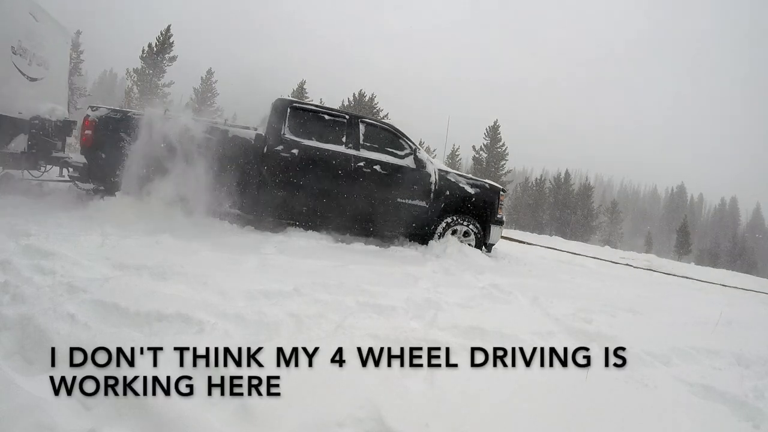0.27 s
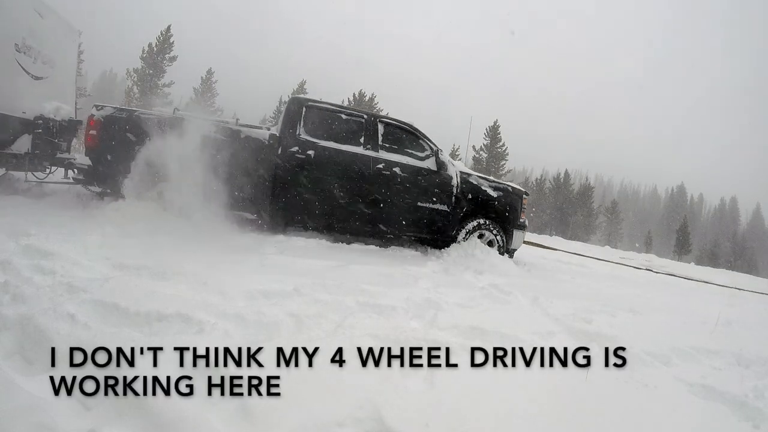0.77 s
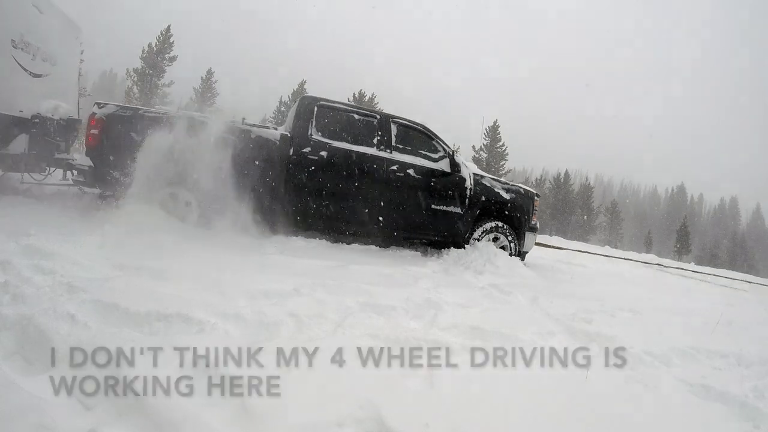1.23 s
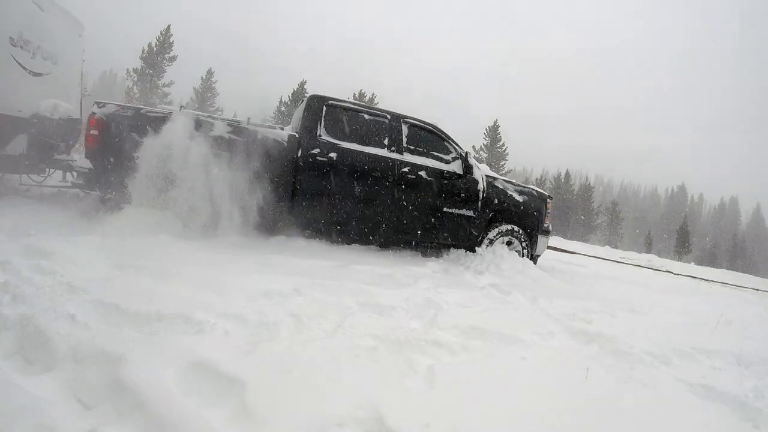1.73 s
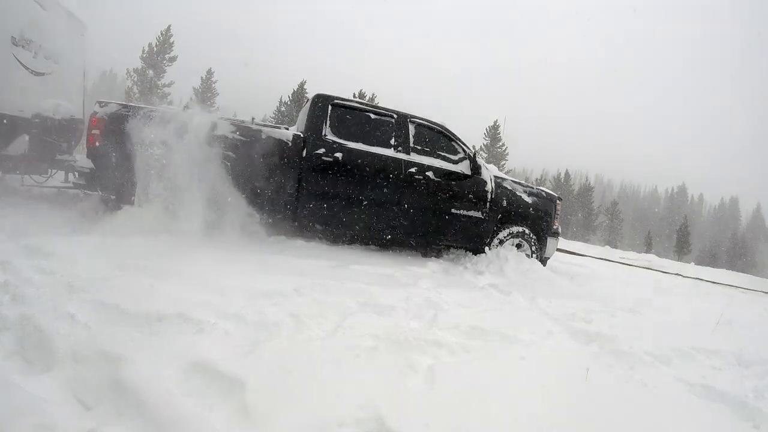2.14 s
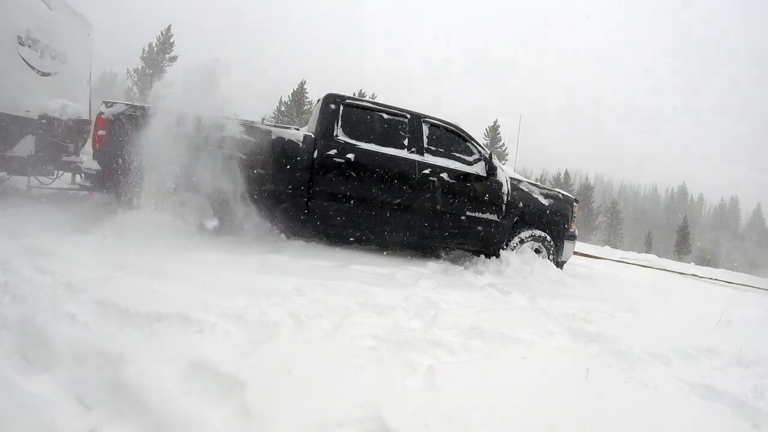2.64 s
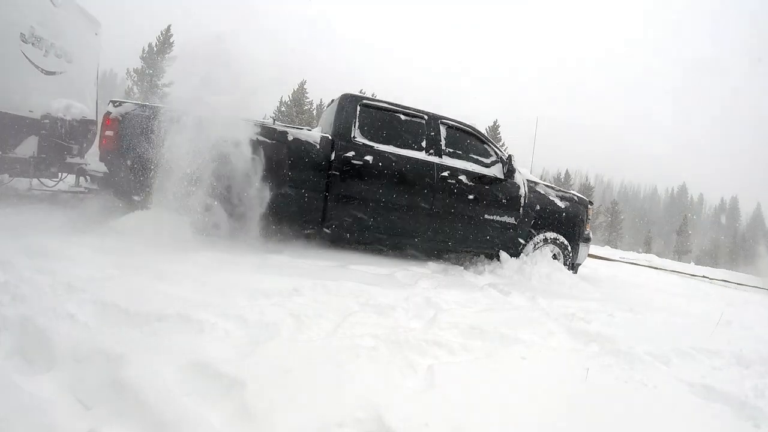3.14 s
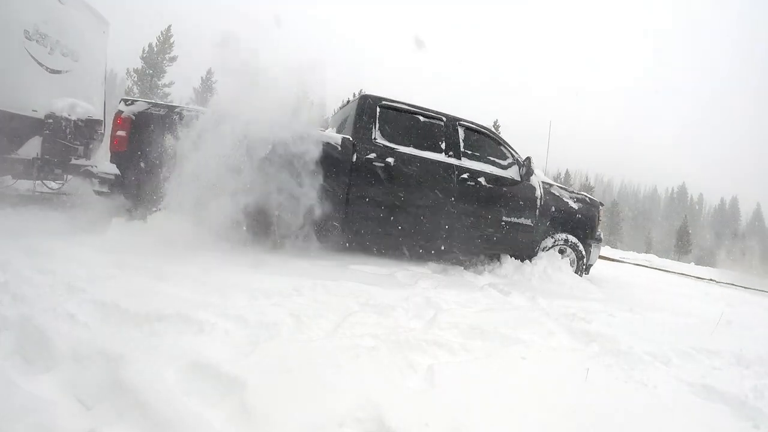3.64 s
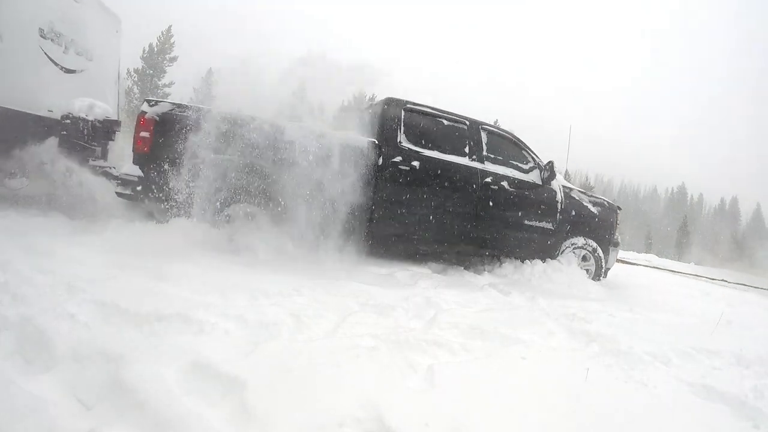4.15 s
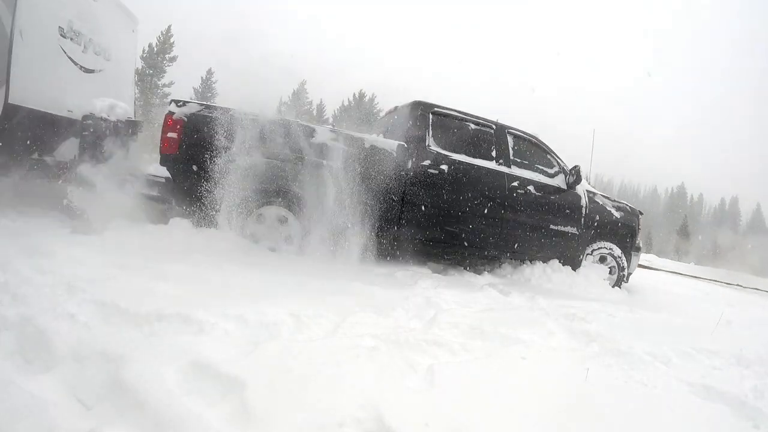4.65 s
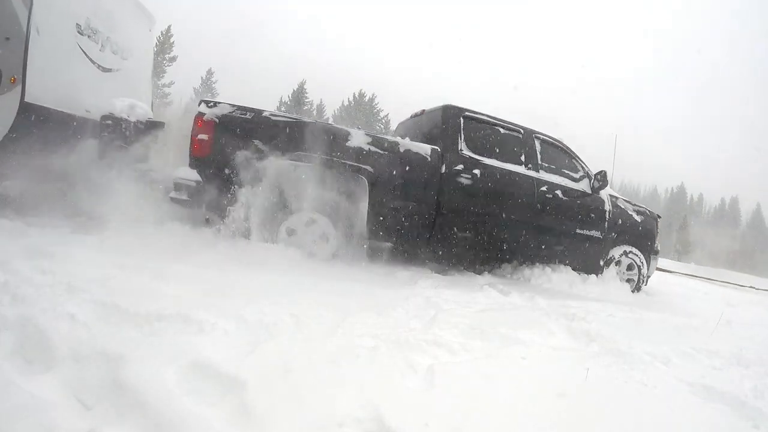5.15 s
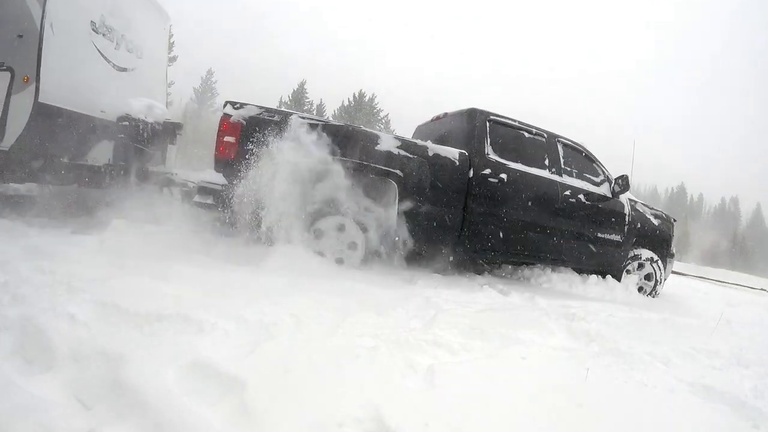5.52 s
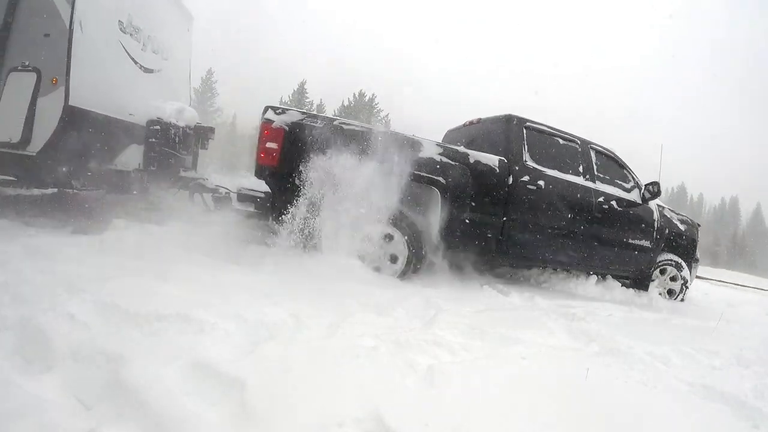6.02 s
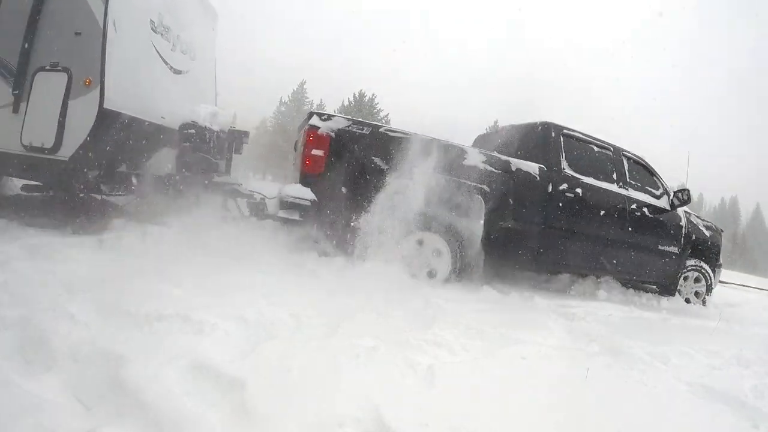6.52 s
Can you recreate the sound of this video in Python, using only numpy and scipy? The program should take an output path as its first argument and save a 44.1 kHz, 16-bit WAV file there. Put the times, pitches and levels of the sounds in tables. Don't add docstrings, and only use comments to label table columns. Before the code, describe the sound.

A strained low engine growl rises, dips, climbs again, then shifts into a steadier drone over hissing snow spray and wind rumble.

```python
import sys
import numpy as np
from scipy import signal
from scipy.fft import rfft, irfft, next_fast_len
from scipy.io import wavfile
from scipy.ndimage import uniform_filter1d, map_coordinates

SR = 44100
rng = np.random.default_rng(int(sys.argv[2]) if len(sys.argv) > 2 else 0)


def persist_wave(psi):
    counts = np.round(np.clip(psi, -1, 1) * 32767).astype(np.int16)
    wavfile.write(sys.argv[1], SR, np.atleast_2d(counts).T)


def attenuation_scalar(level_db):
    decades = np.asarray(level_db, float) / 20
    return 10 ** decades


N = 298557
T = np.arange(N) / SR

# t/s, f/Hz
CRANK_SPEED = [(0, 38.8), (.2, 40.48), (.36, 41.4), (.56, 40.2), (.81, 36.9), (1.13, 29.87), (1.33, 27.91),
               (1.79, 31.8), (1.96, 33.13), (2.72, 34.57), (3.2, 37.29), (3.8, 38), (4, 36.23),
               (4.35, 33.92), (4.55, 44.26), (5.3, 39.63), (5.9, 39.03), (6.77, 35.83)]
MOOD_S = [.55, 1.2, 2.5, 3.1]
# first rev level/dB, climb level/dB, peak level/dB
LOW_ORDERS_DB = [(-18, -18.5, -20.5), (-18.5, -21, -17), (-20, -14, -20.5)]
# order, first rev level/dB, climb level/dB, peak level/dB
UPPER_ORDERS = [(4, -29, -27, -36), (5, -50, -29, -39), (6, -46, -35, -42), (7, -38, -42, -34),
                (8, -32, -35, -33), (9, -36, -35, -41), (10, -44, -41, -39), (11, -30, -34.5, -33),
                (12, -31, -43, -43), (13, -40, -43, -38), (14, -46, -39, -41), (15, -38, -44, -42),
                (16, -33, -50, -37), (17, -43, -46, -41), (18, -38, -35, -32), (19, -42, -47, -36),
                (20, -44, -43, -38), (21, -46, -38, -46), (28, -41, -56, -54), (29, -33, -54, -52),
                (30, -37, -52, -56), (32, -32, -53, -45), (34, -43, -53, -44), (36, -42, -42, -33),
                (38, -45, -52, -40), (40, -40, -43, -44), (43, -44, -46, -38), (44, -48, -48, -40),
                (46, -47, -43, -43), (49, -48, -50, -41)]
EASED_ORDERS = 1, 1.5, 2, 2.5, 4, 6.5, 7, 8, 9
# on catching level/dB, settled level/dB
EASED_ORDERS_DB = [(-32, -26), (-29, -25.5), (-31, -20.5), (-19, -20), (-19.5, -32), (-31, -38.5),
                   (-39, -36.5), (-38, -29.5), (-44, -47)]
# f/Hz, width/Hz, level/dB
BLOCK_MODES = [(945, 200, -16), (1217, 110, -2.5), (1350, 62, -1), (1646, 106, -10.5), (1786, 300, -12.5)]
# t/s, length/s, level/dB
WHEEL_HOPS = [
    (.48, 0.033, -10),
    (.92, 0.031, -5),
    (2.83, 0.019, -3),
    (4.12, .04, -6.5),
    (4.71, .03, -7),
    (4.81, 0.027, -5),
    (5.35, .02, -1),
    (6.64, 0.019, -1),
]
# t/s, f/Hz, level/dB
DRIVELINE = [(0, 75.9, -11.5), (.45, 82.96, -23), (.85, 97.6, -16), (1.2, 112.5, -11), (1.6, 134.4, -23),
             (1.8, 132.4, -42), (2.07, 126.8, -18.5), (2.45, 129.5, -21), (2.8, 126.2, -17),
             (3.07, 117.6, -12), (3.36, 112, -14), (3.85, 104.4, -18), (4.24, 101.8, -13),
             (4.79, 99.87, -20.5), (5.02, 106.7, -12.5), (5.32, 111.8, -13), (6.2, 114, -15),
             (6.77, 119.9, -16)]
# t/s, level/dB
WHEELSPIN = [(0.0, -24), (0.02, -21.5), (0.22, -20.5), (0.66, -24.5), (0.69, -22), (0.96, -26), (1.35, -27),
             (1.65, -22.5), (2.35, -22), (2.91, -21), (3.13, -22), (3.87, -22.5), (4.02, -23.5),
             (4.22, -21.5), (4.56, -32), (5.03, -28.5), (6.29, -29.5), (6.74, -32.5)]
# level/dB at usual effort, slope/(dB per dB of effort)
SNOW_LAYERS = [(-27, 1.01), (-29, 1.06), (-43, 0.66), (-23.5, -0.14)]
# f/Hz, level/dB per Hz
SNOW_COLOUR = [(300, -32), (500, -33), (750, 1), (1000, 0.5), (1400, -1.5), (2200, -7), (3100, -8.5),
               (4000, -10), (5500, -7), (6000, -20.5), (8300, -20.5), (10000, -25), (11300, -40.5),
               (15200, -43.5)]
# f/Hz, level/dB per Hz
CHURN_COLOUR = [(76, -32), (130, -1), (193, -10), (290, -6), (341, -14.5), (460, -10), (527, -16),
                (900, -13), (1170, -56), (1980, -120)]
SPLIT_HZ = 2700, 6200
# t/s, length/s, level/dB
SCOOPS = [(.22, 0.069, 2), (.68, 0.042, 1), (1.15, 0.12, 2.5), (1.6, 0.25, 1.5), (2.82, 0.23, 3),
          (3.86, .04, 2), (4.24, 0.079, 2), (5.15, 0.22, 1), (5.42, .05, -0.5), (5.52, .03, 2),
          (5.72, 0.041, 1), (6.12, 0.089, 2), (6.3, 0.029, 4.5), (6.58, 0.018, 4)]
# t/s, length/s, level/dB
DIGS = [
    (1.66, 0.17, 1.5),
    (3.0, .25, 4),
    (4.15, 0.39, 6),
    (5.05, 0.16, 1.5),
]
# t/s, f/Hz, length/s, level/dB
PANEL_THUDS = [(0.037, 296, 0.067, -17.5), (1.105, 145, 0.13, -13.5), (1.06, 307.2, 0.16, -23),
               (1.9, 183, 0.22, -21.5), (2.964, 278, 0.041, -23.5), (3.8, 210.5, 0.41, -20),
               (4.373, 315, 0.19, -19.5), (5.197, 173.2, .12, -19), (6.15, 190, 0.072, -24)]
# t/s, lag/ms, share/0-1
SNOW_ECHO = [(0, .487, .4), (1.5, .49, .45), (2.7, .49, .5), (3.5, .507, .5), (4.2, .535, .45),
             (4.6, .565, .55), (5.2, .58, .58), (6, .6, .58), (6.77, .605, .55)]
# f/Hz, level/dB
SNOW_SOAK = [(100, 0), (2000, -1), (4300, 1), (5800, -3), (8500, 0), (11000, -9), (16000, -20)]
# f/Hz, level/dB per Hz
RUMBLE_COLOUR = [(12, -36), (24, 6), (45, 5), (75, 8.5), (110, 2), (160, -10.5), (240, -34), (500, -99)]
# t/s, length/s, level/dB
GUSTS = [(1.05, 0.056, 1), (1.8, 0.18, 4), (2.55, 0.18, 2), (2.95, 0.054, 5), (3.7, 0.28, 6),
         (4.2, 0.44, 7), (4.85, 0.4, 8), (5.24, 0.087, 2.5), (5.67, 0.13, 6), (6.1, .1, -1),
         (6.55, 0.31, 9.5)]
# f/Hz,
# width/Hz, level/dB
HOUSING_DIPS = [(6350, 170, -5.5), (11900, 560, -3), (896, 18, -4.5), (2640, 88, -1), (4360, 200, -1),
                (7200, 120, 2)]
# spectrum (f/Hz, level/dB per Hz), then total level/dB
SELF_NOISE = [(3000, -25), (9000, -4.5), (12000, -1), (15500, -9)], -62.5

INERTIA_S = 0.06
LIFT_OFF_S, SHIFT_S, CATCH_S, SETTLE_S = 3.94, 4.567, 4.64, 5.5
SHIFT_DIP_DB = -24
UPPER_DB = 4.5
BOG_HZ, BOG_DB_PER_HZ = 33, 0.8
KNOCK_DB, KNOCK_DB_PER_HZ, KNOCK_AT_HZ = -2.5, 0.2, 38
USUAL_SPIN_DB = -25
PATCHY_DB = 1.1
CALM_DB = -22.5


def curves(table):
    s, *columns = np.transpose(table)
    return [np.interp(T, s, column) for column in columns]


def swells(events):
    return sum(db * np.exp(-((T - s) / length_s) ** 2) for s, length_s, db in events)


def unit(x):
    return x / np.sqrt(np.mean(x ** 2))


def walk(rate_hz):
    held = np.repeat(rng.standard_normal(int(N / SR * rate_hz) + 2), 8)
    slewed = uniform_filter1d(uniform_filter1d(held, size=8), size=8)
    return np.interp(T * rate_hz * 8, np.arange(len(held)), unit(slewed))


def colour(x, points, lo_hz=1.0, hi_hz=20000.0):
    size = next_fast_len(N)
    f = np.arange(1, size // 2 + 2) * SR / size
    hz, db = np.transpose(points)
    gain = attenuation_scalar(np.interp(np.log(f), np.log(hz), db))
    edges = 1 / np.sqrt((1 + (lo_hz / f) ** 8) * (1 + (f / hi_hz) ** 8))
    return irfft(rfft(x, size) * gain * edges, size)[:N]


def noise(points, lo_hz=1.0, hi_hz=19600.0):
    return unit(colour(rng.standard_normal(N), points, lo_hz, hi_hz))


def tone(turns, db, flutter_db, wobble_rad, rate_hz):
    level = np.sqrt(2) * attenuation_scalar(db + flutter_db * walk(rate_hz))
    phase = 2 * np.pi * turns + wobble_rad * walk(rate_hz) + 7 * rng.random()
    return level * np.sin(phase)


def mood(first_db, climb_db, peak_db):
    return np.interp(T, MOOD_S, [first_db, climb_db, climb_db, peak_db])


def exhaust_orders(turns, crank_hz, load_db):
    out = 0
    for order, db in enumerate(LOW_ORDERS_DB, 1):
        level_db = load_db + swells(WHEEL_HOPS) + mood(*db)
        out = out + tone(order * turns, level_db, flutter_db=2.5, wobble_rad=0.49, rate_hz=9)
    upper_db = load_db + UPPER_DB + BOG_DB_PER_HZ * np.minimum(crank_hz - BOG_HZ, 0)
    for order, *db in UPPER_ORDERS:
        out = out + tone(order * turns, upper_db + mood(*db), flutter_db=2.1, wobble_rad=0.28, rate_hz=9)
    caught_db = np.interp(T, [LIFT_OFF_S, SHIFT_S, CATCH_S], [3 * SHIFT_DIP_DB, SHIFT_DIP_DB, 0])
    for order, db in zip(EASED_ORDERS, EASED_ORDERS_DB):
        level_db = caught_db + np.interp(T, [CATCH_S, SETTLE_S], db)
        out = out + tone(order * turns, level_db, flutter_db=4.0, wobble_rad=0.49, rate_hz=11)
    return out


def block_knock(turns):
    knocks = np.diff(np.floor(turns), prepend=0) * attenuation_scalar(1.2 * rng.standard_normal(N))
    ring = 0
    for hz, width_hz, db in BLOCK_MODES:
        mode = signal.iirpeak(hz, hz / width_hz, SR)
        ring = ring + attenuation_scalar(db) * unit(signal.lfilter(*mode, signal.lfilter(*mode, knocks)))
    return unit(ring)


def engine(turns, crank_hz, hiss_db):
    load_db = np.interp(T, [LIFT_OFF_S, SHIFT_S, CATCH_S], [0, SHIFT_DIP_DB, 3 * SHIFT_DIP_DB])
    knock_db = hiss_db + load_db + KNOCK_DB + KNOCK_DB_PER_HZ * (crank_hz - KNOCK_AT_HZ)
    return exhaust_orders(turns, crank_hz, load_db) + block_knock(turns) * attenuation_scalar(knock_db)


def driveline():
    hz, db = curves(DRIVELINE)
    return tone(np.cumsum(hz) / SR, db + swells(WHEEL_HOPS), flutter_db=1.37, wobble_rad=0.51, rate_hz=12)


def snow(turns, hiss_db, spray_db, fine_db, churn_db):
    surge = walk(8) + 0.58 * walk(35)
    throb = np.cos(2 * np.pi * turns)
    hiss_db = hiss_db - 1.07 + 0.51 * surge + 0.3 * throb + 0.53 * walk(9)
    spray_db = spray_db + 0.45 + 0.16 * surge + 0.28 * throb + 0.17 * walk(20)
    fine_db = fine_db + 4.5 + 0.37 * surge + 0.87 * throb + 0.62 * walk(17)
    churn_db = churn_db - 2.0 + 0.45 * walk(4.76)
    hiss = noise(SNOW_COLOUR, hi_hz=SPLIT_HZ[0]) * attenuation_scalar(hiss_db)
    spray = noise(SNOW_COLOUR, *SPLIT_HZ) * attenuation_scalar(spray_db)
    fine = noise(SNOW_COLOUR, lo_hz=SPLIT_HZ[1]) * attenuation_scalar(fine_db)
    churn = noise(CHURN_COLOUR) * attenuation_scalar(churn_db)
    return hiss + spray + fine + churn


def panel_thuds():
    out = 0
    for s, hz, length_s, db in PANEL_THUDS:
        boom = noise([(hz * 0.75, -60), (hz * 0.93, 0), (hz * 1.07, 0), (hz * 1.3, -60)])
        out = out + attenuation_scalar(db) * boom * np.exp(-((T - s) / length_s) ** 2)
    return out


def snow_echo(x):
    lag_ms, share = curves(SNOW_ECHO)
    echo = map_coordinates(colour(x, SNOW_SOAK), [np.arange(N) - lag_ms * SR / 1000], order=3)
    return (x + share * echo) / np.sqrt(1 + share ** 2)


def wind_rumble():
    level_db = CALM_DB + swells(GUSTS) + swells(WHEEL_HOPS) + 1.05 * walk(5.5)
    return noise(RUMBLE_COLOUR) * attenuation_scalar(level_db)


def scene():
    crank_hz = uniform_filter1d(curves(CRANK_SPEED)[0], int(INERTIA_S * SR))
    turns = np.cumsum(crank_hz) / SR
    effort_db = curves(WHEELSPIN)[0] - USUAL_SPIN_DB
    hiss_db, spray_db, fine_db, churn_db = (db + slope * effort_db for db, slope in SNOW_LAYERS)
    patches_db = PATCHY_DB * walk(15) * np.interp(T, [LIFT_OFF_S, CATCH_S], [0.3, 1])
    flung_db = swells(SCOOPS) + patches_db
    spray_db = spray_db + 0.85 * flung_db
    fine_db = fine_db + 1.38 * flung_db
    thrown = snow(turns, hiss_db, spray_db, fine_db, churn_db + swells(DIGS))
    truck = attenuation_scalar(-4.5) * (engine(turns, crank_hz, hiss_db) + panel_thuds()) + thrown
    return (snow_echo(truck) + driveline() + wind_rumble())[None]


def housing(x):
    f = np.arange(N // 2 + 1) * SR / N
    gain_db = sum(db * np.exp(-((f - hz) / width_hz) ** 2) for hz, width_hz, db in HOUSING_DIPS)
    return irfft(rfft(x) * attenuation_scalar(gain_db), N)


def band_limit(x):
    return signal.sosfilt(signal.butter(12, 15200, fs=SR, output="sos"), x)


def record(dry):
    hiss_colour, hiss_db = SELF_NOISE
    heard = housing(dry) + attenuation_scalar(hiss_db) * noise(hiss_colour)
    mix = np.tanh(0.89 * heard) / 0.91 * attenuation_scalar(0.26)
    return band_limit(mix)


dry = scene()
out = record(dry)
persist_wave(out)
```